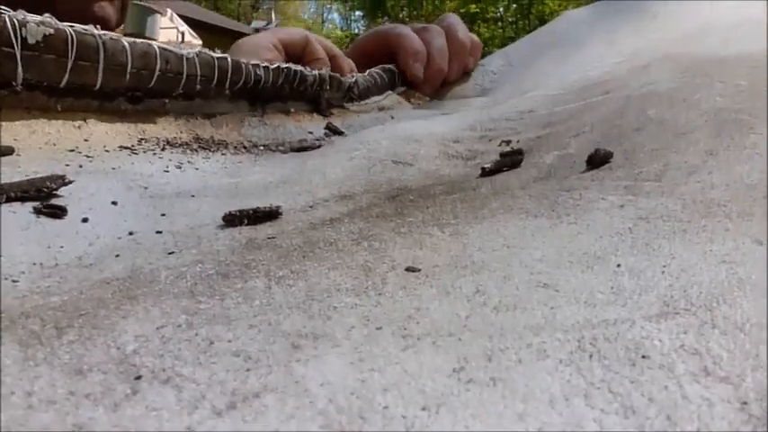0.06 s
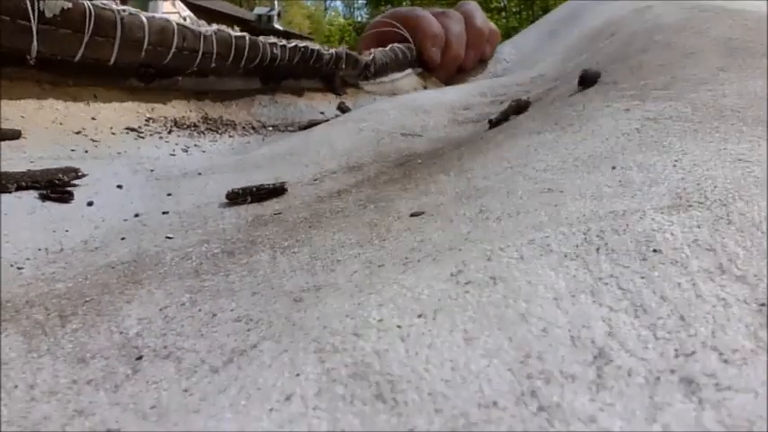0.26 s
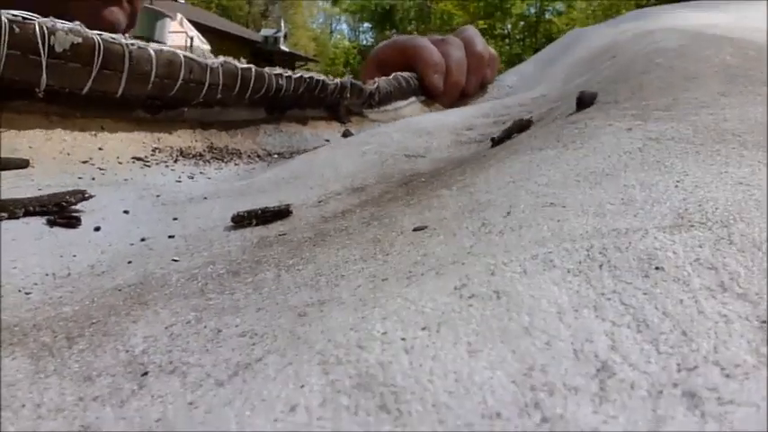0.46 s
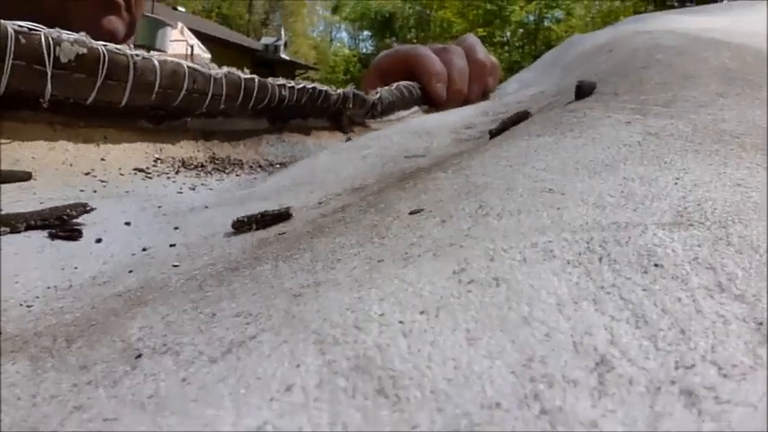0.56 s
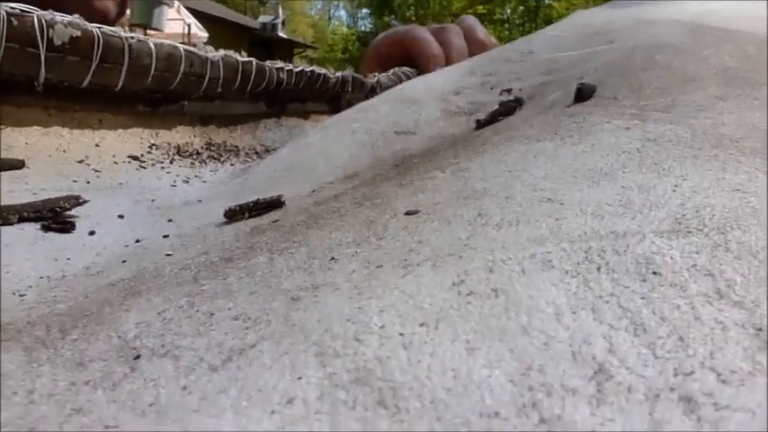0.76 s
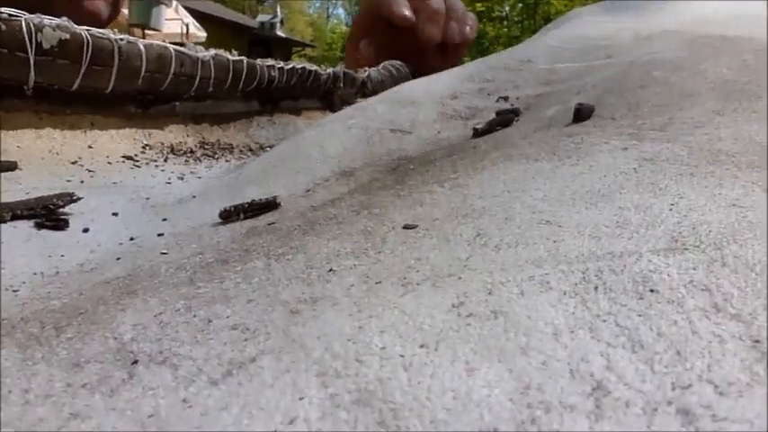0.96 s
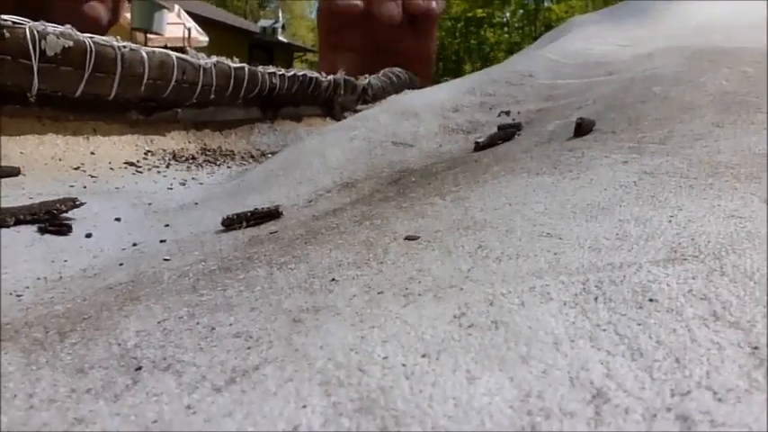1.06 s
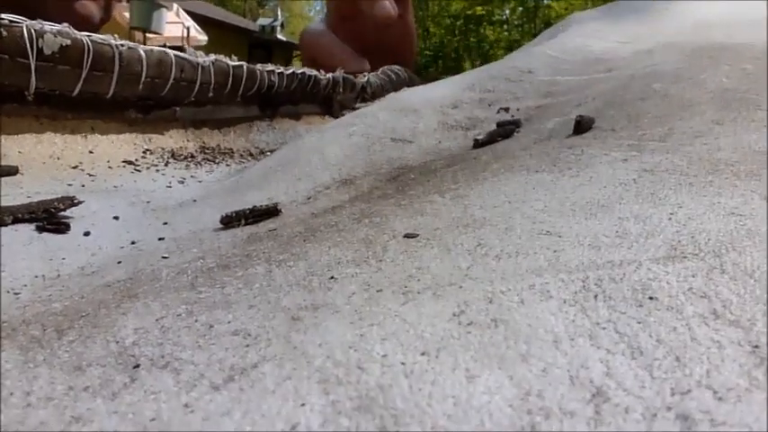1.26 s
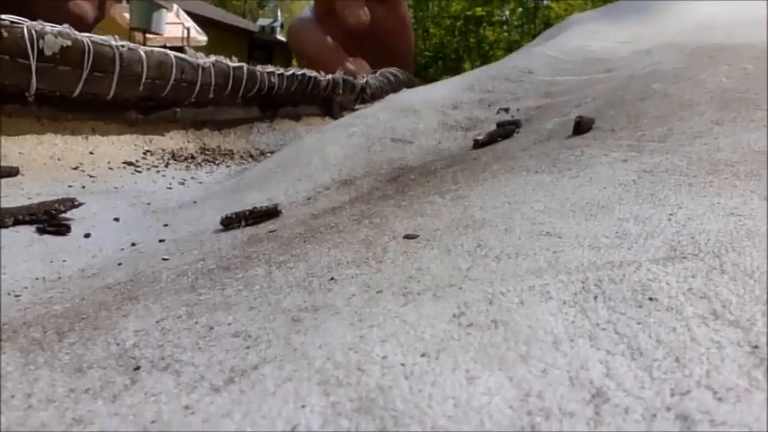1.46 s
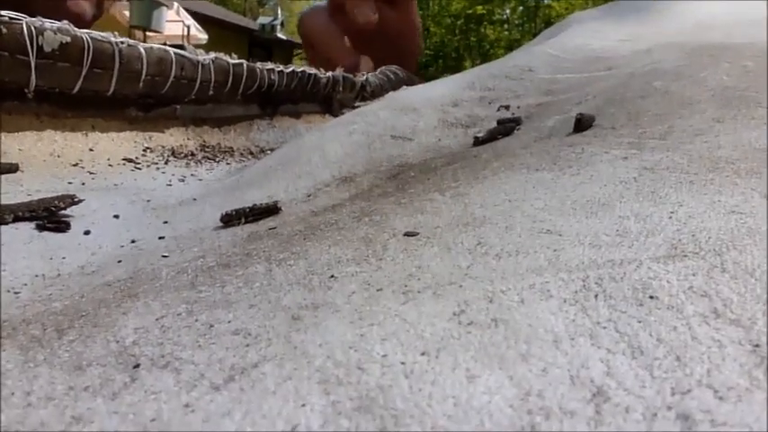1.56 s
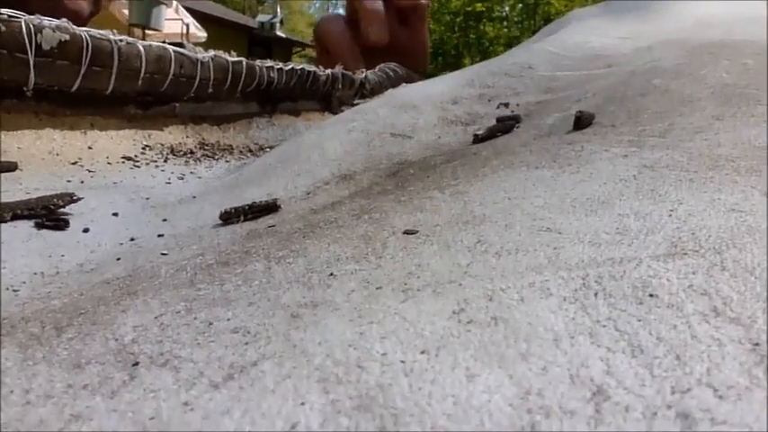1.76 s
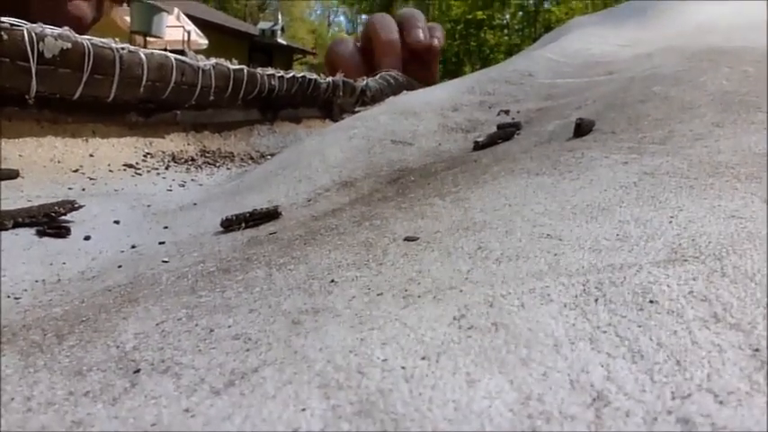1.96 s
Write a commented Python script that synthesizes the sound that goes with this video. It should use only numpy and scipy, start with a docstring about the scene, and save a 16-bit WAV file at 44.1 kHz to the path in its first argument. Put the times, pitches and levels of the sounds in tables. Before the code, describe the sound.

A hand works canvas cloth outdoors: brief swishes, one wooden snap, then small creaks.

```python
"""A canvas cover rubs and swishes as a hand works it against a cord-lashed wooden frame, outdoors.
The rub is a dense grain of threads catching and letting go. Something snaps once and rings the frame,
the tight cloth creaks in small slips and takes soft bumps, and nearby surfaces add a short tail.
Behind it all lies a steady outdoor hiss with a few faint, far whistles, likely birds."""
import sys
import numpy as np
from scipy import signal
from scipy.fft import rfft, irfft
from scipy.io import wavfile

SR = 44100
rng = np.random.default_rng(int(sys.argv[2]) if len(sys.argv) > 2 else 0)


def waveform_to_disk(signal):
    """Save audio, clipped to [-1, 1], as 16-bit WAV at the path in sys.argv[1]."""
    frames = np.transpose(np.atleast_2d(signal))
    scaled = np.clip(frames, -1, 1) * 32767
    samples = np.round(scaled).astype(np.int16)
    wavfile.write(sys.argv[1], SR, samples)


N = 88200
T = np.arange(N) / SR

# tone of the outdoor hiss: f/Hz, level/dB
AIR_COLOUR = [(18, -53), (30, -59), (75, -22), (213, -9), (262, -5.5), (294, -4), (353, -2.5), (573, -2),
              (643, -1.5), (689, -2.5), (756, -3), (848, -3), (1770, -11.5), (1940, -10), (4260, -17.5),
              (6300, -26), (7400, -41), (9620, -63), (16300, -120)]
# level ride of that hiss: t/s, level/dB
AIR_RIDE = [(0, -48), (.3, -47.5), (.45, -50.5), (.7, -49), (1.1, -48.5), (1.5, -49), (1.8, -48),
            (2.0, -46)]
# a faint mid-range hiss swelling at the end: t/s, level/dB
SWELL_RIDE = [(0, -91), (1.7, -71.5), (1.85, -61), (1.95, -58), (2.0, -55)]
# far whistles: peak t/s, rise/s, fall/s, level/dB, f/Hz
WHISTLE_NOTES = [(0.81, 0.23, 0.12, -62.5, 4160), (0.95, 0.097, 0.11, -71, 4250),
                 (1.19, 0.014, 0.026, -59, 2720), (1.37, 0.11, 0.13, -62.5, 3140),
                 (1.93, 0.046, 0.05, -50, 1750)]
# soft bumps of the hand on the cloth: t/s, level/dB
BUMP_HITS = [(0.041, -47), (0.131, -41.5), (0.283, -54), (0.7403, -35), (1.447, -46)]
# ring of the stretched cloth: f/Hz, level/dB, t60/s
CLOTH_MODES = [(149, 0, 0.025), (423, 7, 0.01)]
# slips of the tight cloth on the frame: t/s, level/dB
SLIP_HITS = [(1.4329, -26), (1.4340, -34), (1.4352, -45), (1.4377, -27.5), (1.4395, -43), (1.4407, -31),
             (1.4435, -39), (1.547, -41), (1.6545, -34.5), (1.6845, -43), (1.6928, -31.5), (1.6980, -40),
             (1.7017, -35), (1.7058, -40), (1.7095, -33), (1.7247, -33)]
# ring of one slip: f/Hz, level/dB, t60/s
CREAK_MODES = [(764, -2, .012), (1107, -8, 0.026), (1620, -26, 0.0078), (3800, -12, .003),
               (5630, -14, 0.002)]
# the snap, with small ticks before and after: t/s, level/dB
SNAP_HITS = [(0.0442, -30), (0.2485, -34), (0.2498, -32), (0.2509, -0.5), (0.2622, -48), (0.2649, -32),
             (0.2709, -22.5), (0.2886, -43)]
# ring of the wooden frame: f/Hz, level/dB, t60/s
FRAME_MODES = [(156, -22.5, 0.016), (264, -39.5, 0.033), (590, -4.5, .012), (732, -15, 0.012),
               (1318, -7.5, 0.0069), (2070, -10, 0.0059), (4120, -24.5, 0.015), (4670, -13, 0.0065),
               (5300, -21, 0.0067)]
# tone of the canvas friction: f/Hz, level/dB
CANVAS_COLOUR = [(100, -11.5), (400, -0.5), (1000, 5.5), (2200, 9.5), (4700, -3.5), (5600, -4.5),
                 (7200, -14)]
# bursts of canvas friction (hand strokes, plus the bright crack at the snap and a short grit within the slips):
# peak t/s, rise/s, fall/s, level/dB, rasp f/Hz, rasp width/Hz, rasp gain/dB
CANVAS_BURSTS = [(0.078, .024, 0.071, -43, 3800, 3020, 5.5), (0.11, 0.014, .030, -42, 2570, 2980, -11),
                 (0.126, 0.0046, 0.0088, -54, 4790, 3000, 19), (0.169, .05, 0.15, -54, 3830, 2480, 7.5),
                 (0.2505, 0.0055, 0.0046, -29.5, 3240, 3000, -1), (0.329, .05, 0.057, -51, 3800, 2240, 4),
                 (0.539, 0.09, 0.023, -55.5, 3650, 2500, 0), (0.63, 0.11, 0.091, -52, 4260, 4100, 4),
                 (1.063, 0.03, 0.023, -50, 4200, 1400, 19),
                 (1.438, 0.0078, 0.0064, -53.5, 5800, 2500, 7.5),
                 (1.700, 0.019, 0.033, -49, 4330, 3500, 3)]


def from_db(db):
    """Decibels to gain."""
    return 10 ** (np.asarray(db) / 20)


def rms_one(x):
    """Scale to unit power."""
    return x / np.sqrt(np.mean(x ** 2) + 1e-20)


def ride(points):
    """A fader move through (t/s, level/dB) points, as gain."""
    return from_db(np.interp(T, *np.transpose(points)))


def arch(peak_s, rise, fall):
    """A rounded fade in and out around one moment."""
    return np.sin(np.pi / 2 * np.interp(T, [peak_s - rise, peak_s, peak_s + fall], [0, 1, 0]))


def colour(x, points):
    """EQ a signal through (f/Hz, level/dB) points, at unit power."""
    hz, db = np.transpose(points)
    bin_hz = np.maximum(np.arange(N // 2 + 1) * SR / N, 1)
    eq = from_db(np.interp(np.log(bin_hz), np.log(hz), db))
    return rms_one(irfft(rfft(x) * eq, N))


def roll_off(x, kind, hz, order=2):
    """A "low" pass dulls the top; a "high" pass thins the bass."""
    return signal.sosfilt(signal.butter(order, hz, kind, fs=SR, output="sos"), x)


def resonance(x, hz, width_hz):
    """A resonant band with unity gain at its peak."""
    radius = np.exp(-np.pi * width_hz / SR)
    feedforward = np.array([1, 0, -1]) * (1 - radius ** 2) / 2
    feedback = [1, -2 * radius * np.cos(2 * np.pi * hz / SR), radius ** 2]
    return signal.lfilter(feedforward, feedback, x + 1e-18)


def strike(hits, modes):
    """Each hit is one click that rings a set of damped modes."""
    clicks, out = np.zeros(N), np.zeros(N)
    for s, db in hits:
        clicks[int(s * SR)] += from_db(db)
    for hz, db, t60 in modes:
        width_hz = np.log(1000) / (np.pi * t60)
        out += from_db(db) * SR / (2 * np.pi * width_hz) * resonance(clicks, hz, width_hz)
    return out


def outdoor_hiss():
    """A smooth bed of far hiss, with a narrow band that swells late."""
    bed = ride(AIR_RIDE) * colour(rng.standard_normal(N), AIR_COLOUR)
    band = resonance(rng.standard_normal(N), hz=1860, width_hz=240)
    return bed + ride(SWELL_RIDE) * rms_one(band)


def far_whistles(width_hz=190):
    """Thin held notes, blurred by distance into narrow bands of noise."""
    white, out = rng.standard_normal(N), np.zeros(N)
    for peak_s, rise, fall, db, hz in WHISTLE_NOTES:
        note = resonance(resonance(white, hz, width_hz), hz, width_hz)
        out += from_db(db) * arch(peak_s, rise, fall) * rms_one(note)
    return out


def scatter(x, wet_db=-19.5, t60_s=0.049, predelay_s=0.0067):
    """Nearby surfaces throw back a short, diffuse tail."""
    tail = rng.standard_normal(N) * from_db(-60 * T / t60_s) * (T > predelay_s)
    return from_db(wet_db) * signal.fftconvolve(x, tail / np.linalg.norm(tail))[:N]


def hand_bumps():
    """The hand lands softly and the stretched cloth gives a dull thud."""
    return roll_off(strike(BUMP_HITS, CLOTH_MODES), "low", hz=690)


def cloth_creak():
    """Tight cloth slips on the frame in runs of ringing ticks, cushioned by the fabric."""
    return roll_off(strike(SLIP_HITS, CREAK_MODES), "low", hz=3000)


def frame_snap():
    """A snap rings the wood, cushioned by cloth; the frame is dead between its low and middle modes."""
    knock = roll_off(strike(SNAP_HITS, FRAME_MODES), "low", hz=3140, order=3)
    return knock - resonance(knock, hz=352, width_hz=152)


def canvas_rub(threads_per_s=4000, spread_db=3, smooth_db=-3.5):
    """Threads catch and let go in dense tiny grains; each burst has its own band of rasp."""
    sizes = from_db(spread_db * np.minimum(rng.exponential(1, N), 4))
    polarity = rng.choice([-1, 1], N)
    catches = rng.random(N) < threads_per_s / SR
    grains = rms_one(sizes * polarity * catches)
    friction = colour(grains + from_db(smooth_db) * rng.standard_normal(N), CANVAS_COLOUR)
    out = np.zeros(N)
    for peak_s, rise, fall, db, hz, width_hz, rasp_db in CANVAS_BURSTS:
        rasp = resonance(resonance(friction, hz, width_hz), hz, width_hz)
        out += from_db(db) * arch(peak_s, rise, fall) * rms_one(friction + from_db(rasp_db) * rasp)
    return out


def scene():
    """A mono mix: canvas and contacts up close, the open air behind."""
    contacts = frame_snap() + cloth_creak() + hand_bumps()
    contacts = roll_off(contacts, "high", hz=97)  # frame and cloth radiate little bass
    return (contacts + scatter(contacts) + canvas_rub() + outdoor_hiss() + far_whistles())[None]


def record(dry, top_hz=7400):
    """The microphone drops the deep bass; the top is cut steeply."""
    thinned = roll_off(dry, "high", hz=45)
    top_cut = signal.firwin(301, top_hz, window="blackman", fs=SR)
    return signal.fftconvolve(thinned, top_cut[None], "same")


dry = scene()
out = record(dry)
waveform_to_disk(out)
```